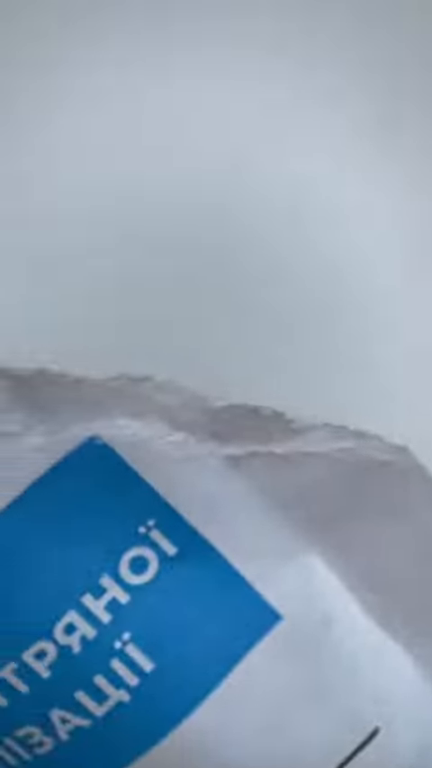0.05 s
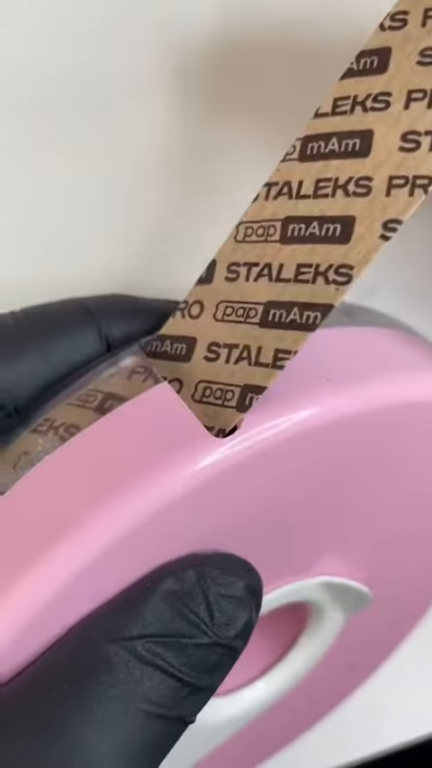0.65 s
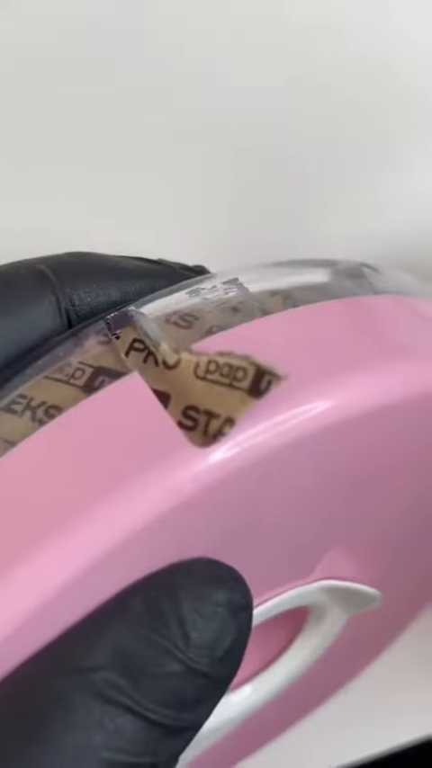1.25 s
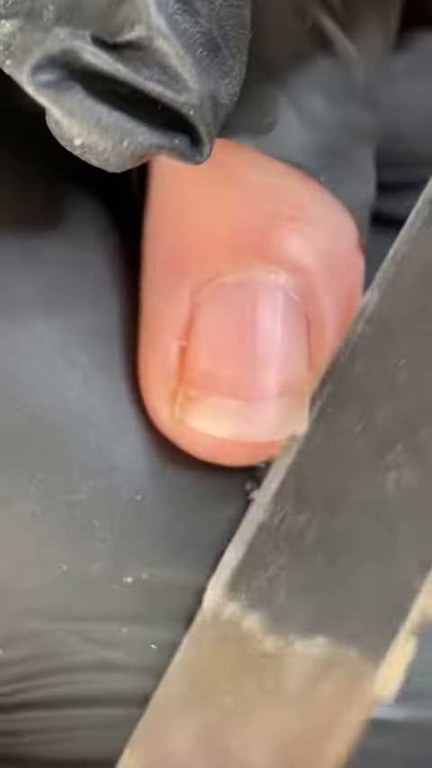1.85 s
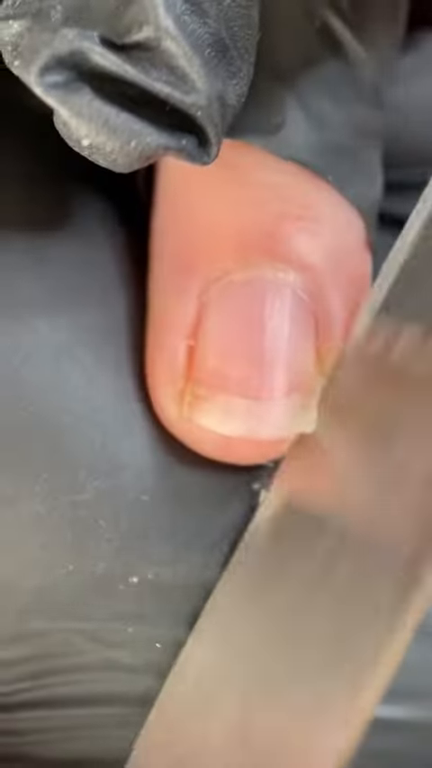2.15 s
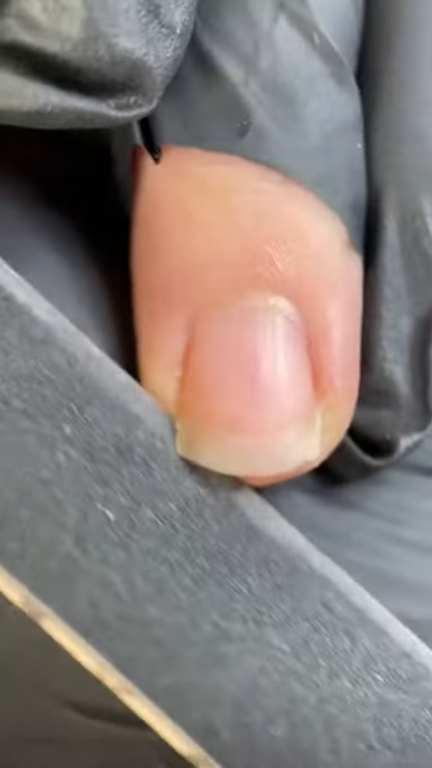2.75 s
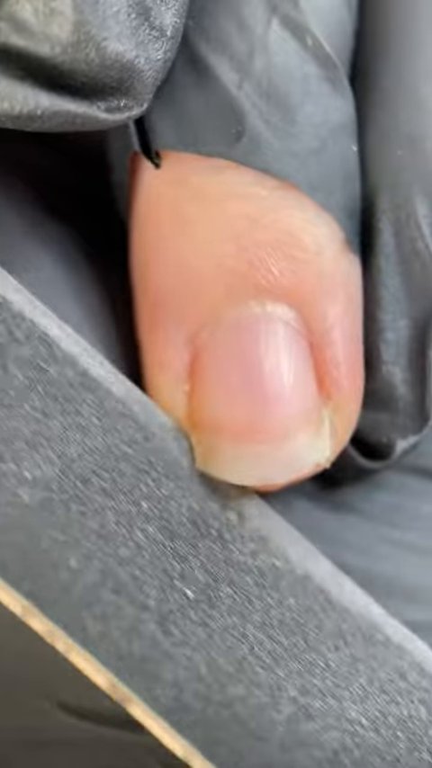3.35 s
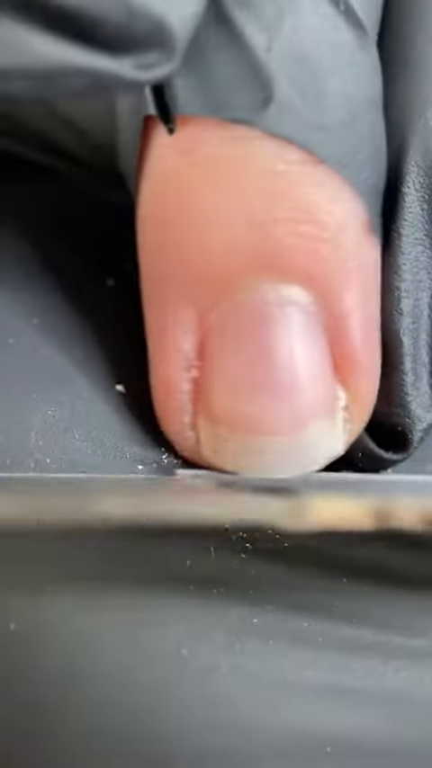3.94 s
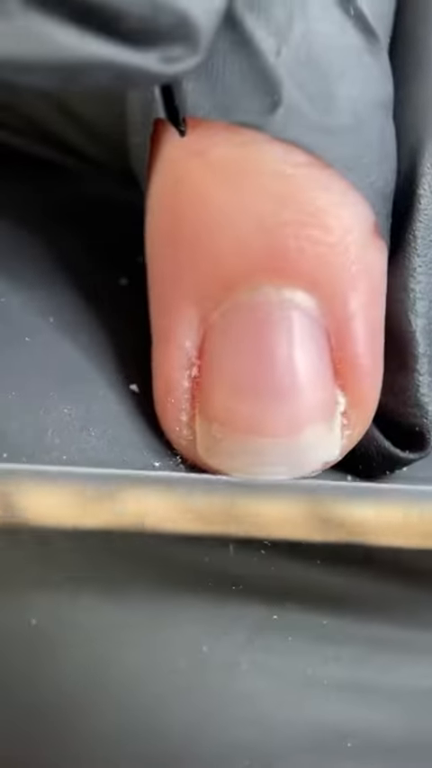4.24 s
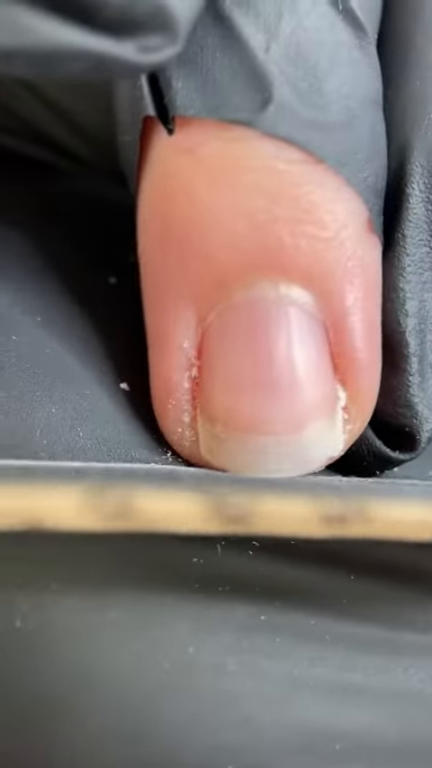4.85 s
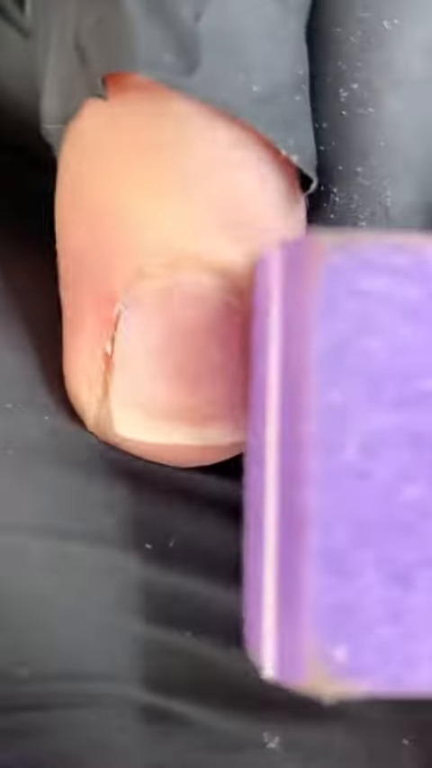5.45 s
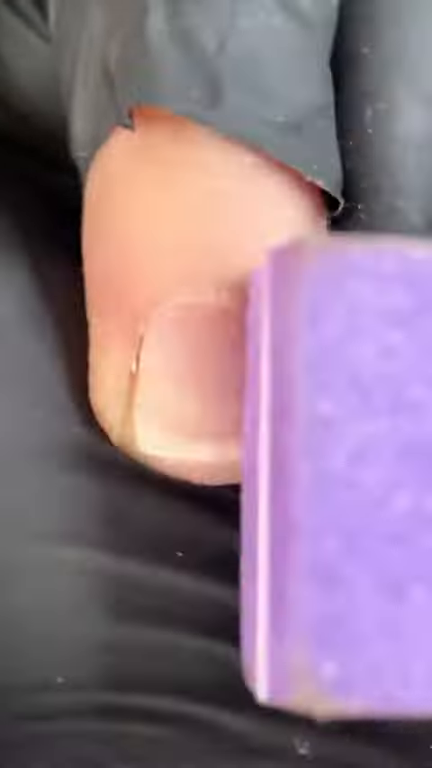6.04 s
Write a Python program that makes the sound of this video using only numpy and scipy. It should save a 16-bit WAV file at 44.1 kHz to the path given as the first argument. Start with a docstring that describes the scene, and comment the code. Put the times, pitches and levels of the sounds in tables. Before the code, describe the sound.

After a very faint paper rustle, a hand knocks softly on a plastic dispenser. From about 0.2 to 0.6 seconds abrasive paper tape is pulled out with a crackling rasp, and at 0.8 to 1 second it rips off sharply, fibres snapping. These are the loudest sounds. After a short pause, a file makes quick, quieter strokes along a fingernail from 1.5 to 2.3 seconds, then brushes past with a faint squeak. From 2.6 to 3.5 seconds it judders over the nail's edge with small, sharp gritty clicks. Longer crackling strokes and a smooth hissing slide follow until 5.3 seconds. From 5.4 to 6.1 seconds a foam buffer block rubs the nail in short, dense, slightly louder strokes. Everything is close to a phone microphone in a small, dry room, over faint rumble and hiss, with a low hum from about 2.5 to 5.4 seconds.

```python
"""Paper tape and nail filing

Close to a phone in a small, dry room, abrasive paper tape is drawn from a plastic dispenser and ripped
off, its fibres snapping. A file rasps a fingernail along its side, round its corner and across its tip:
grit strikes the nail, sticks and lets go in small cracks. A foam buffer block then rubs it in short
strokes. A low hum, rumble and faint hiss lie underneath."""
import sys
import numpy as np
from scipy import signal
from scipy.fft import rfft, irfft
from scipy.io import wavfile
from scipy.ndimage import uniform_filter1d

SR = 44100
rng = np.random.default_rng(int(sys.argv[2]) if len(sys.argv) > 2 else 0)


def generate_wav(sig):
    """Save sig (samples, or channels by samples) to the path in sys.argv[1] as 16-bit PCM at SR."""
    pcm = np.round(np.clip(np.atleast_2d(sig).T, -1, 1) * 32767).astype(np.int16)
    wavfile.write(sys.argv[1], SR, pcm)


N = 268569
TIME = np.arange(N) / SR


# file on the side of the nail: t/s, length/s, level/dB, attack/s, release/s
SIDE_STROKES = [(1.525, .08, -44.5, 0.0054, 0.021), (1.772, 0.099, -49.5, 0.015, 0.073),
                (1.875, .11, -47.5, 0.024, 0.032), (2.15, 0.085, -53.5, 0.0096, 0.032),
                (2.258, 0.066, -45.5, 0.012, 0.019)]
# its spectrum: f/Hz, level/dB
SIDE_TONE = [(280, -5.5), (730, -21), (1240, -15.5), (1760, -23), (3250, -13.5), (3770, -9), (4810, -12.5),
             (5070, -15.5), (6760, -13), (7150, -20), (8450, -12), (8840, -1), (13500, -21), (15600, -19.5)]

def file_side():
    """Short, quick strokes along the side of the nail; grit catches without stalling the file."""
    gain = trailing(pressure(SIDE_STROKES, arch_db=5.5, lean_db=4.5))
    slips = catches(SIDE_STROKES, gain, per_s=32, weak_db=-41)
    rasp = friction(gain, SIDE_TONE, gain_db=-1.5, grains_per_s=3600, spread_db=4.5,
                    slip_hz=220, slip_db=0.6, mottle_db=0.5, hiss=0.74, flex=0.72)
    return rasp + cracks(slips, SIDE_TONE, gain_db=12, decay_s=0.0013, chatter=0.12)


# file on the corner: t/s, length/s, level/dB, attack/s, release/s
CORNER_STROKES = [(2.598, 0.25, -54.5, .028, 0.034), (2.84, 0.097, -65, 0.035, 0.012)]
# its spectrum: f/Hz, level/dB
CORNER_TONE = [(280, 2.5), (800, -12.5), (1350, -4.5), (1760, -13), (2290, -2), (2500, -6), (3640, -4),
               (4550, -13), (6370, -4), (7540, -11), (8320, -9), (8840, -2.5), (14100, -14), (15600, -8)]

def file_corner():
    """The file judders round the corner of the nail, easing off as it goes."""
    gain = pressure(CORNER_STROKES, arch_db=-3.5, lean_db=-8)
    slips = catches(CORNER_STROKES, gain, per_s=45, weak_db=-42)
    rasp = friction(gain * sticking(slips), CORNER_TONE, gain_db=4.5, grains_per_s=450, spread_db=1.5,
                    slip_hz=130, slip_db=3, mottle_db=2.5, hiss=0.68)
    return rasp + cracks(slips, CORNER_TONE, gain_db=13, decay_s=0.0015, chatter=0.077)


# file on the edge: t/s, length/s, level/dB, attack/s, release/s
EDGE_STROKES = [(3.08, 0.458, -59.5, 0.035, 0.094)]
# its spectrum: f/Hz, level/dB
EDGE_TONE = [(280, -10), (870, -27.5), (4420, -10.5), (4810, -17), (5850, -8.5), (6370, -2.5), (6500, -8),
             (7020, -11), (7540, -15.5), (9750, -3), (10270, -11), (11180, -6), (12300, -18), (15600, -17)]

def file_edge():
    """On the thin edge of the nail the grit catches hardest."""
    gain = pressure(EDGE_STROKES, arch_db=1.5, lean_db=1)
    slips = catches(EDGE_STROKES, gain, per_s=55, weak_db=-37)
    rasp = friction(gain * sticking(slips), EDGE_TONE, gain_db=4.5, grains_per_s=510, spread_db=2,
                    slip_hz=121, slip_db=2, mottle_db=3, hiss=0.83)
    return rasp + cracks(slips, EDGE_TONE, gain_db=9, decay_s=0.00057, chatter=0.04)


# file across the tip: t/s, length/s, level/dB, attack/s, release/s
TIP_STROKES = [(3.585, 0.39, -51, 0.021, 0.024), (4.62, 0.648, -56, 0.25, 0.025)]
# its spectrum: f/Hz, level/dB
TIP_TONE = [(280, -0.5), (950, -21), (1350, -12.5), (4290, 1), (5070, -11.5), (5460, -1), (6240, 1.5),
            (6630, -3), (8060, -8.5), (9620, 1.5), (10530, -6.5), (11180, -3), (11700, -12), (15600, -12.5)]

def file_tip():
    """Long strokes stick and slip across the tip of the nail, crackling."""
    gain = trailing(pressure(TIP_STROKES, arch_db=7, lean_db=4.5))
    slips = catches(TIP_STROKES, gain, per_s=42, weak_db=-42)
    rasp = friction(gain * sticking(slips), TIP_TONE, gain_db=-0.6, grains_per_s=700, spread_db=0,
                    slip_hz=129.8, slip_db=0.5, mottle_db=0, hiss=0.96, flex=0.99)
    return rasp + cracks(slips, TIP_TONE, gain_db=14.5, decay_s=0.00056, chatter=0.076)


# glide back between the tip strokes: t/s, length/s, level/dB, attack/s, release/s
RETURN_STROKES = [(4.054, 0.2, -52, 0.014, 0.036), (4.228, 0.078, -49.5, 0.011, .025),
                  (4.275, 0.21, -62, .02, 0.1)]
# its brightening: f/Hz, gain/dB
RETURN_TILT = [(1500, -3.5), (6000, -0.5), (9500, 3.5), (15000, -2)]

def file_return():
    """The file slides back across the tip: a smooth, bright hiss of fine grit."""
    gain = trailing(pressure(RETURN_STROKES, arch_db=8.5, lean_db=-8))
    glide = friction(gain, TIP_TONE, gain_db=-0.5, grains_per_s=1500, spread_db=2.5,
                     slip_hz=129, slip_db=1, mottle_db=0.5, hiss=0.97, flex=0.22)
    return shape(glide, RETURN_TILT)


# file drawn away: t/s, length/s, level/dB, attack/s, release/s
BRUSH_STROKE = [(2.303, 0.248, -63.5, .02, .012)]

def file_brush(squeak_hz=1740, sag_hz_per_s=850, width_hz=100):
    """The file brushes past lightly, with a faint squeak that sinks in pitch."""
    start, length = BRUSH_STROKE[0][:2]
    hiss = unit(shape(rng.standard_normal(N), HISS_TONE))
    hiss *= pressure(BRUSH_STROKE, arch_db=-1, lean_db=-2.5)
    hz = squeak_hz - sag_hz_per_s * np.clip(TIME - start, 0, length)
    squeak = unit(wander(width_hz) * sine(hz)) * pressure(BRUSH_STROKE, arch_db=11, lean_db=11)
    return amp(-1.5) * hiss + amp(-4) * squeak


# loudest catches of grit on the nail: t/s, level/dB, ring f/Hz
LOUD_CATCHES = [(1.5352, -28.5, 9550), (1.9042, -29.5, 9480), (2.2647, -37, 8690), (2.5932, -36.5, 10500),
                (2.6263, -31.5, 3670), (2.6697, -35, 3440), (2.728, -35.5, 9300), (2.826, -33.5, 9050),
                (2.8518, -45, 2970), (2.8761, -39.5, 8700), (2.894, -38, 8640), (3.106, -35, 3680),
                (3.1292, -33, 8550), (3.1877, -42, 10300), (3.2006, -25.5, 3530), (3.2398, -30, 6400),
                (3.2586, -30.5, 9900), (3.2962, -21, 7100), (3.3423, -19, 6960), (3.3526, -27.5, 6400),
                (3.4556, -29, 9500), (3.4632, -26.5, 9570), (3.6325, -32.5, 7650), (3.6599, -34.5, 4280),
                (3.793, -36, 4220), (3.8298, -34, 2580), (3.9258, -38.5, 4340), (4.2409, -34.5, 9400),
                (4.743, -40, 5900), (4.7617, -32.5, 9200), (4.7694, -41, 9740), (4.7972, -39.5, 5550),
                (4.8276, -37, 5530), (4.8577, -37.5, 9700), (4.9322, -38.5, 3820), (5.06, -38, 4000),
                (5.1372, -39, 4140), (5.1872, -36, 4100), (5.2222, -40.5, 4160)]
# ring range of the weak catches: low f/Hz, high f/Hz
WEAK_RING_HZ = (3000, 9500)
STICK_S, STICK_DB = 0.012, -2.5

def catches(strokes, gain, per_s, weak_db, jitter=0.4, spread_db=4, follow_db_per_db=0.7):
    """Rows of grit catches: the loud ones, plus weak ones that recur unevenly and follow the pressure."""
    start, end = strokes[0][0], strokes[-1][0] + strokes[-1][1]
    loud = [row for row in LOUD_CATCHES if start - 0.02 <= row[0] < end]
    gap, strength, ring = rng.uniform(-1, 1, (100, 3)).T
    times = start + np.cumsum(1 + jitter * gap) / per_s
    pressure_db = 20 * np.log10(np.interp(times, TIME, gain / gain.max()) + 1e-9)
    db = weak_db + follow_db_per_db * pressure_db + spread_db * strength
    hz = np.exp(np.interp(ring, [-1, 1], np.log(WEAK_RING_HZ)))
    clear_of_loud = np.min([abs(times - row[0]) for row in loud], axis=0) > STICK_S
    return loud + list(np.transpose([times, db, hz])[clear_of_loud & (times < end)])


def sticking(slips):
    """Gain of the rasp, which sinks while the file is stuck before each catch."""
    stuck, dip = np.zeros(N), np.hanning(round(STICK_S * SR))
    for start, _, _ in slips:
        add(stuck, start - STICK_S, dip)
    return amp(STICK_DB * np.minimum(stuck, 1))


def trailing(gain, trail_db=-19, trail_s=0.078):
    """Adds the light contact that lingers after each stroke."""
    pole = np.exp(-1 / (trail_s * SR))
    return gain + amp(trail_db) * signal.lfilter([1 - pole], [1, -pole], gain)


# buffer block on the nail: t/s, length/s, level/dB, attack/s, release/s
BUFF_STROKES = [(5.364, .088, -40.5, .003, 0.045), (5.465, 0.037, -55, .016, 0.021),
                (5.525, .076, -38.5, .012, .018), (5.636, .15, -52, 0.011, 0.027),
                (5.8, 0.21, -41, 0.063, 0.023), (6.033, .09, -41.5, 0.015, .01)]
# its spectrum: f/Hz, level/dB
BUFF_TONE = [(280, -5.5), (1610, -20), (2500, -13), (2860, -22.5), (3250, -8), (4550, 1.5), (6240, 1),
             (7410, -12.5), (7670, -17), (8970, -3), (9750, -2), (11830, -7), (12300, -16.5), (15600, -16)]

def buffer_block():
    """Fine grit on soft foam: a dense, even rub. The first stroke lands harder and flexes the nail."""
    landing_gain = pressure(BUFF_STROKES[:1], arch_db=2, lean_db=0.5)
    landing = friction(landing_gain, BUFF_TONE, gain_db=-2, grains_per_s=5000, spread_db=2.5,
                       slip_hz=200, slip_db=0.8, mottle_db=2, hiss=0.7, flex=0.41)
    rub_gain = pressure(BUFF_STROKES[1:], arch_db=0, lean_db=-2)
    rub = friction(rub_gain, BUFF_TONE, gain_db=-0.85, grains_per_s=6500, spread_db=3,
                   slip_hz=200, slip_db=2, mottle_db=0, hiss=0.83)
    return landing + rub


# tape drawn out, torn off: t/s, length/s, level/dB, attack/s, release/s
PULL_STROKES = [(.137, .15, -61.5, 0.0044, .02), (.248, .308, -29.5, .13, .064)]
RIP_STROKES = [(.838, 0.09, -29, 0.0075, 0.02), (0.919, 0.054, -27, .012, 0.013)]
# their spectra: f/Hz, level/dB
PULL_TONE = [(280, -3.5), (800, -19), (1240, -6.5), (1610, -10.5), (2990, -1), (4550, -5.5), (5850, -1),
             (7020, -8.5), (7670, -21.5), (8840, -5), (10660, -8.5), (12900, -8.5), (13200, -19.5),
             (15600, -14.5)]
RIP_TONE = [(280, -8), (870, -16.5), (1350, -12), (1610, -19), (4030, 0), (4160, -5.5), (6240, 1.5),
            (6630, -10), (8190, -11.5), (8970, -1), (11700, -1.5), (12300, -2), (13500, -15.5),
            (15600, -1.5)]
# paper fibres snapping: t/s, level/dB, ring f/Hz
FIBRE_SNAPS = [(.1435, -45, 5300), (.2755, -30, 3000), (.3025, -22.5, 6000), (.3487, -12, 4500),
               (.369, -16, 3800), (.8412, -16, 6000), (.856, -15, 5100), (.9357, -24, 3700),
               (.9423, -23, 9600), (.957, -20, 5600), (.96, -19, 1100)]

def tape():
    """The tape cracks loose and runs out over the dispenser's lip, then tears across the cutter."""
    split_s = RIP_STROKES[0][0] - 0.1
    pull_snaps = [row for row in FIBRE_SNAPS if row[0] < split_s]
    pull_gain = pressure(PULL_STROKES, arch_db=6, lean_db=2)
    pull = friction(pull_gain, PULL_TONE, gain_db=-1, grains_per_s=2500, spread_db=0.5,
                    slip_hz=250, slip_db=0.2, mottle_db=1.5, hiss=0.8)
    pull += cracks(pull_snaps, RIP_TONE, gain_db=9, decay_s=0.0005, chatter=0.04, ring_db=5)
    rip_snaps = [row for row in FIBRE_SNAPS if row[0] >= split_s]
    rip_gain = pressure(RIP_STROKES, arch_db=2, lean_db=10.5)
    rip = friction(rip_gain, RIP_TONE, gain_db=-2.5, grains_per_s=3500, spread_db=1,
                   slip_hz=155, slip_db=0.6, mottle_db=3, hiss=0.62, flex=0.46)
    rip += cracks(rip_snaps, RIP_TONE, gain_db=11.5, decay_s=0.00079, chatter=0.045)
    return pull + rip


# rumble of the dispenser case: f/Hz, level/dB
CASE_TONE = [(25, -4.5), (70, 1), (130, -2), (230, 5), (340, -10), (600, -44.5)]
# hand on the case: t/s, level/dB, f/Hz, t60/s
HAND_KNOCKS = [(0.124, -26, 186, 0.037), (0.5, -43.5, 241.5, 0.15), (0.962, -42, 125, 0.11)]

def dispenser():
    """The tug on the tape shakes the case, and the hand knocks softly on it."""
    tug = uniform_filter1d(pressure(PULL_STROKES + RIP_STROKES, arch_db=-0.5, lean_db=4.5), size=2500)
    shake = unit(shape(rng.standard_normal(N), CASE_TONE))
    return amp(-22.5) * tug * shake + knocks(HAND_KNOCKS)


# handled paper: t/s, length/s, level/dB, attack/s, release/s
RUSTLE_STROKE = [(0.0015, 0.12, -60, .004, .02)]
# its spectrum: f/Hz, level/dB
RUSTLE_TONE = [(200, 8.5), (800, -1.5), (1500, -9.5), (3000, -18), (6500, -25.5), (9000, -44)]

def paper():
    """A paper pouch shifts in the hand with a soft, dull rustle."""
    gain = pressure(RUSTLE_STROKE, arch_db=0, lean_db=0)
    return friction(gain, RUSTLE_TONE, gain_db=-5, grains_per_s=2100, spread_db=1,
                    slip_hz=58.8, slip_db=1, mottle_db=1.5, hiss=1)


def pressure(strokes, arch_db, lean_db, ramp_power=1.21):
    """Stroke envelopes: the middle stands arch_db above the ends; lean_db is gained from start to end."""
    gain = np.zeros(N)
    for start, length, db, attack, release in strokes:
        t = np.arange(0, length, 1 / SR)
        contact = (np.minimum(t / attack, 1) * np.minimum((length - t) / release, 1)) ** ramp_power
        from_middle = t / length - 0.5
        add(gain, start, contact * amp(db + lean_db * from_middle - arch_db * (2 * from_middle) ** 2))
    return gain


def friction(gain, tone, gain_db, grains_per_s, spread_db, slip_hz, slip_db, mottle_db, hiss, flex=0):
    """Grit strikes a surface, in clumps as the contact sticks and slips, over a hiss of fine contacts."""
    sizes = amp(spread_db * np.minimum(rng.exponential(1, N), 3)) * rng.choice([-1, 1], N)
    grains = unit(sizes * (rng.random(N) < grains_per_s / SR))
    drive = grains + hiss * rng.standard_normal(N)
    drive *= amp(slip_db * np.clip(wander(slip_hz), -2, 2))
    rasp = signal.oaconvolve(mottle(drive, mottle_db), body(tone)[None])[:, :N]
    # pressed hard, the surface flexes and its low ring swells
    low_ring = shape(rasp, [(700, -4.5), (1500, 4), (2600, 2.5), (4500, -6), (8000, -29)])
    return amp(gain_db) * gain * unit(rasp + flex * (gain / gain.max()) ** 2 * low_ring)


# phase scatter at the two microphones: f/Hz, phase/rad
MIC_SCATTER = [(1800, 0.11), (3500, 0.33), (5000, .38), (7600, 0.9), (8600, 0.6), (16000, 0.16)]

def mottle(x, depth_db, size=128):
    """Each grain meets another spot, so it has its own colour and its own path to the microphones."""
    hz, _, spectra = signal.stft(x, SR, nperseg=size)
    patches = uniform_filter1d(rng.standard_normal((2, *spectra.shape)), size=5, axis=1)
    colour, path = map(unit, uniform_filter1d(patches, size=2, axis=2))
    turn = np.exp(1j * read(MIC_SCATTER, hz)[:, None] * path)
    stereo = spectra * amp(depth_db * colour) * np.array([turn, turn.conj()])
    return signal.istft(stereo, nperseg=size)[1][:, :len(x)]


def cracks(rows, tone, gain_db, decay_s, chatter, ring_db=7, size=1024):
    """A caught edge lets go in a burst of tiny fractures that favours one ring, then chatters briefly."""
    out, t, hz = np.zeros(N), np.arange(size) / SR, np.fft.rfftfreq(size, 1 / SR)
    response = body(tone)
    burst = (1 - np.exp(-t / 0.0009)) ** 2 * (np.exp(-t / decay_s) + chatter * np.exp(-t / 0.004))
    for start, db, ring_hz in rows:
        emphasis = amp(ring_db * np.exp(-(np.log((hz + 1) / ring_hz) / 0.28) ** 2))
        fractures = irfft(emphasis * np.exp(2j * np.pi * rng.random(len(hz))), size)
        crack = signal.fftconvolve(burst * fractures, response)
        add(out, start, amp(db + gain_db) * crack / np.linalg.norm(crack))
    return out


def body(tone, low_cut_hz=170, size=2048):
    """Minimum-phase impulse response of a small object: its spectrum, with no deep bass."""
    hz = abs(np.fft.fftfreq(size, 1 / SR))
    log_gain = np.log(amp(read(tone, hz)) / (1 + (low_cut_hz / (hz + 10)) ** 3))
    ring = np.fft.ifft(np.exp(np.conj(signal.hilbert(log_gain)))).real[:size // 2]
    return ring / np.linalg.norm(ring)


def knocks(rows, attack_s=0.0054):
    """Each knock is a short, low, well-damped push."""
    out, t = np.zeros(N), np.arange(SR // 4) / SR
    for start, db, hz, t60 in rows:
        envelope = amp(db - 60 * t / t60) * (1 - np.exp(-t / attack_s))
        add(out, start, envelope * np.sin(2 * np.pi * hz * t))
    return out


# room decay: f/Hz, t60/s
ROOM_T60 = [(250, .42), (700, .28), (1800, .34), (5000, .38), (10000, .3), (13000, .21), (16000, .14)]

def room(x, early_db=-11, early_decay_s=0.003, tail_db=-17.5, echoes_per_s=3000):
    """Quick reflections from hands and table, then a soft tail; each microphone hears its own."""
    t = np.arange(SR // 2) / SR
    near, far = rng.choice([-1, 1], (2, 2, len(t))) * (rng.random((2, 2, len(t))) < echoes_per_s / SR)
    early = near * np.exp(-t / early_decay_s) * (t > 0.0006)
    hz, frame_s, spectra = signal.stft(far * (t > 0.008), SR, nperseg=256)
    decay = amp(-60 * frame_s / read(ROOM_T60, hz)[:, None])
    tail = signal.istft(spectra * decay, SR, nperseg=256)[1][:, :len(t)]
    echoes = sum(amp(db) * part / np.linalg.norm(part, axis=1, keepdims=True)
                 for db, part in [(early_db, early), (tail_db, tail)])
    return x + signal.fftconvolve(x, echoes, axes=1)[:, :N]


# spells of hum: t/s, length/s, level/dB, attack/s, release/s
HUM_SPELLS = [(2.527, .42, -50, 0.0069, 0.016), (3.068, 2.31, -54.5, 0.014, 0.021)]
# tones, one list per spell: f/Hz, level/dB
HUM_LINES = [
    [(52, -2.5), (80, 4), (104, -4.5)],
    [(58, 1), (80, -3), (130, -17.5)],
]
# thumps as the hum starts and stops: t/s, level/dB, f/Hz, t60/s
HUM_THUMPS = [(2.525, -51, 45, 0.14), (3.062, -40, 36, .12), (5.355, -44, 33.7, .14)]

def hum(waver_db=1.6, waver_hz=2.51):
    """Low tones waver in pitch and strength and dip mid-spell, between dull thumps."""
    out = knocks(HUM_THUMPS)
    for spell, lines in zip(HUM_SPELLS, HUM_LINES):
        tones = sum(amp(db + waver_db * wander(2.5)) * sine(hz + waver_hz * wander(6.2))
                    for hz, db in lines)
        out += pressure([spell], arch_db=-8.5, lean_db=2) * unit(tones)
    return out


# background spectra: f/Hz, level/dB
RUMBLE_TONE = [(20, -11), (38, -15), (52, 2), (66, 6), (80, 4.5), (100, -3), (135, -7.5), (250, -58.5)]
DRONE_TONE = [(20, -25), (110, -1.5), (200, 1), (300, -2), (400, -17), (520, -13.5), (650, -32),
              (1200, -34), (3000, -76.5)]
HISS_TONE = [(300, 0), (1000, 0), (2000, -1), (4000, -1), (6300, -3), (7600, -13), (9500, -9), (13000, -16),
             (16000, -20)]
# background steps: t/s, rumble level/dB, hiss level/dB
NOISE_STEPS = [(0, -54.5, -77.5), (.14, -58.5, -79.5), (1.53, -65, -73.5), (2.53, -56.5, -80),
               (5.37, -56, -72)]

def room_noise(drone_db=-61.5):
    """A steady, faint drone, with a mono rumble and a wide hiss that step in level."""
    starts, rumble_db, hiss_db = np.transpose(NOISE_STEPS)
    step = np.searchsorted(starts[1:], TIME)
    rumble_gain, hiss_gain = uniform_filter1d(amp([rumble_db[step], hiss_db[step]]), size=600)
    rumble = rumble_gain * unit(shape(rng.standard_normal(N), RUMBLE_TONE))
    air = rng.standard_normal(N) + 1.41 * rng.standard_normal((2, N))
    drone = amp(drone_db) * unit(shape(air, DRONE_TONE))
    hiss = hiss_gain * unit(shape(air, HISS_TONE))
    return rumble + drone + hiss


def amp(db):
    """Decibels to gain."""
    return 10 ** (np.asarray(db) / 20)


def unit(x):
    """Scales to unit rms."""
    return x / np.sqrt(np.mean(x ** 2) + 1e-20)


def sine(hz):
    """Sine of varying frequency."""
    return np.sin(2 * np.pi * np.cumsum(hz) / SR)


def read(points, hz):
    """Interpolates a table over log frequency."""
    point_hz, value = np.transpose(points)
    return np.interp(np.log(hz + 1), np.log(point_hz + 1), value)


def add(mix, start_s, sound):
    """Mixes a sound in at start_s."""
    part = mix[max(round(start_s * SR), 0):][:len(sound)]
    part += sound[:len(part)]


def shape(x, tone):
    """Zero-phase filter with the given spectrum."""
    return irfft(rfft(x) * amp(read(tone, np.fft.rfftfreq(N, 1 / SR))), N)


def wander(rate_hz):
    """Smooth unit-rms noise up to rate_hz."""
    hz = np.fft.rfftfreq(N, 1 / SR)
    return unit(irfft(rfft(rng.standard_normal(N)) / (1 + (hz / rate_hz) ** 4), N))


def scene():
    """The handwork in its room, over noise and hum."""
    filing = file_side() + file_brush() + file_corner() + file_edge() + file_tip() + file_return()
    handwork = paper() + tape() + dispenser() + filing + buffer_block()
    return room(handwork) + room_noise() + hum()


# stereo width of the phone: f/Hz, side gain/dB
STEREO_WIDTH = [(100, -28.5), (700, 4.5), (1800, -9), (3500, -7.5), (5000, -2), (7600, -8), (8600, 1),
                (16000, 0.5)]

def record(dry, treble_delay_s=64 / SR, cutoff_hz=15850):
    """The phone sets the width by band, spreads the top treble with a short delay, and low-passes."""
    mid, side = dry.mean(0), (dry[0] - dry[1]) / 2
    treble = shape(mid, [(11800, -57.5), (12400, -3)])
    side = shape(side, STEREO_WIDTH) + np.interp(TIME - treble_delay_s, TIME, treble)
    low_pass = signal.firwin(401, cutoff_hz, window=("kaiser", 9), fs=SR)
    return signal.oaconvolve(np.array([mid + side, mid - side]), low_pass[None], "same")


dry = scene()
out = record(dry)
generate_wav(out)
```